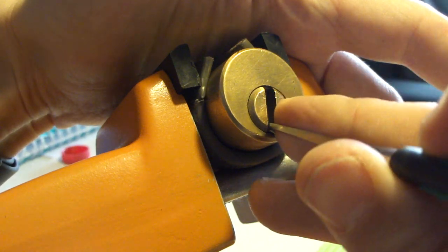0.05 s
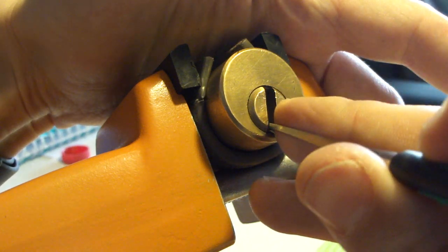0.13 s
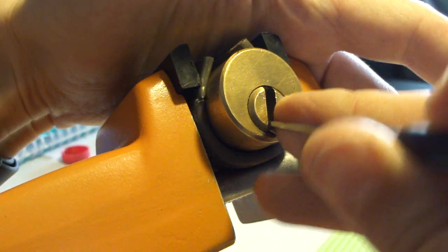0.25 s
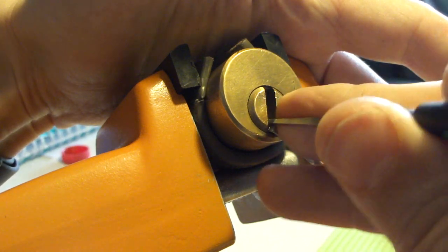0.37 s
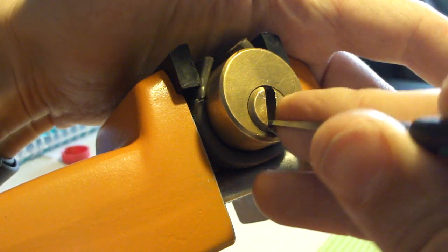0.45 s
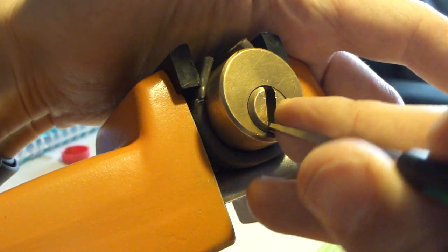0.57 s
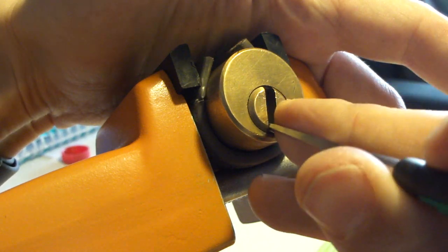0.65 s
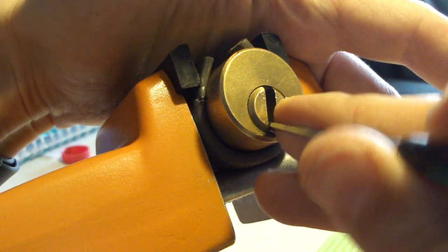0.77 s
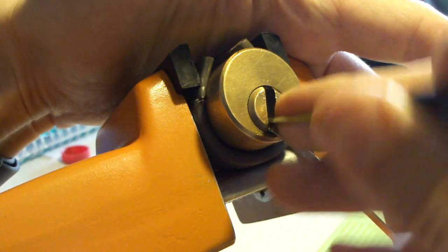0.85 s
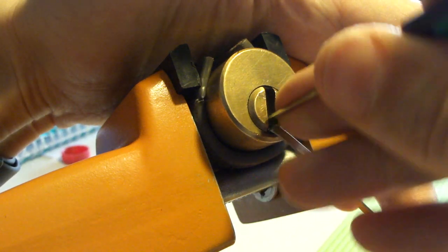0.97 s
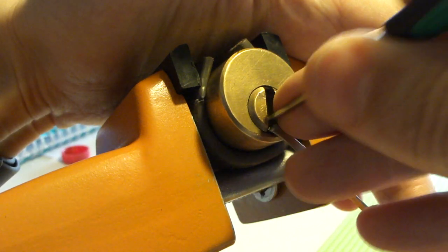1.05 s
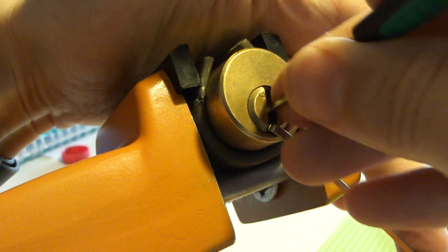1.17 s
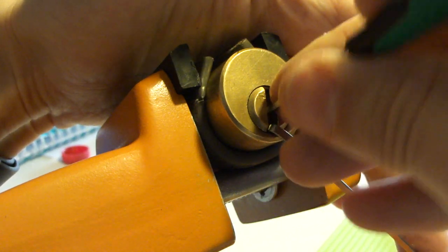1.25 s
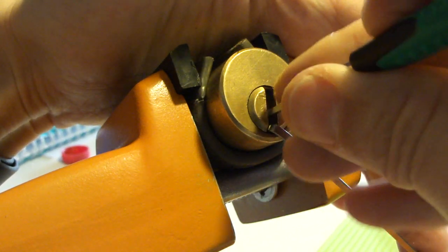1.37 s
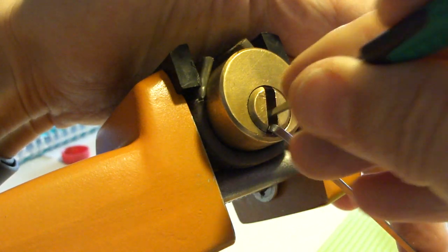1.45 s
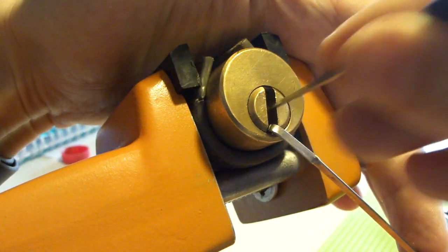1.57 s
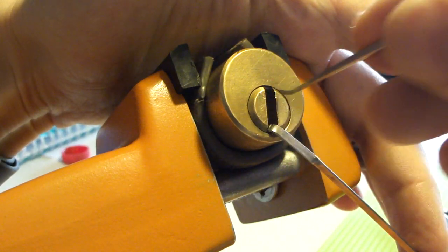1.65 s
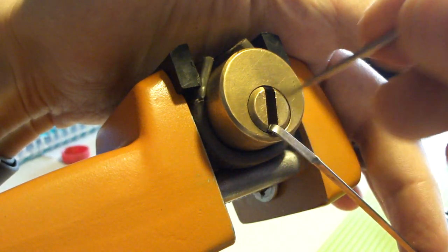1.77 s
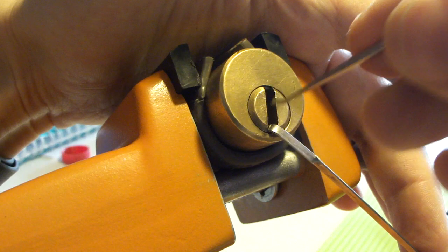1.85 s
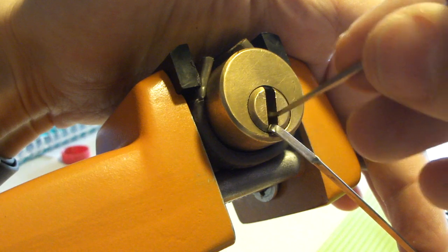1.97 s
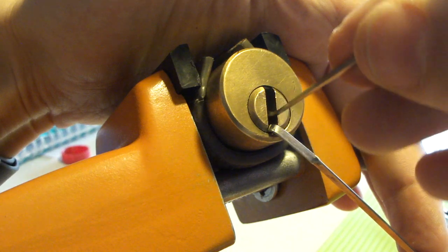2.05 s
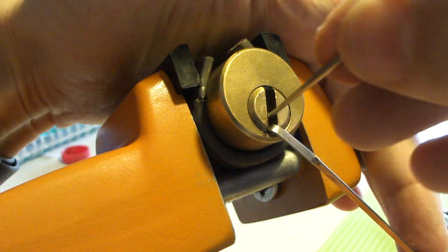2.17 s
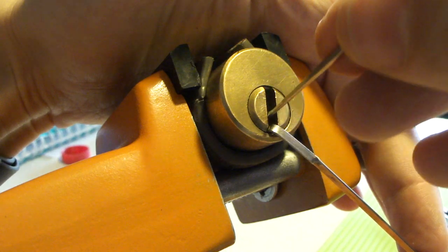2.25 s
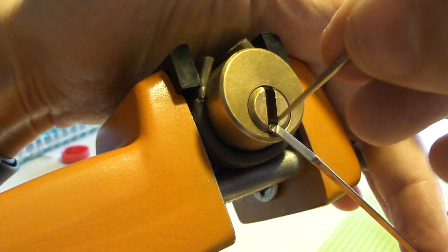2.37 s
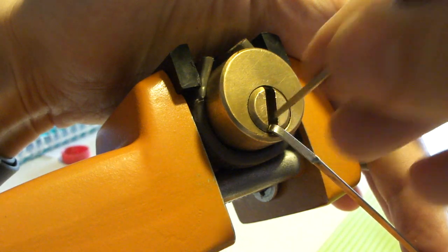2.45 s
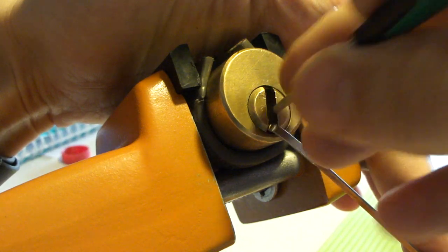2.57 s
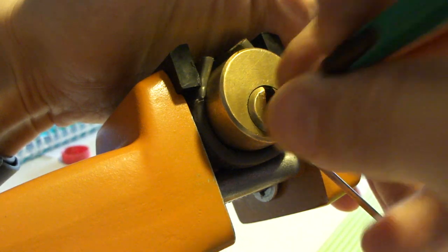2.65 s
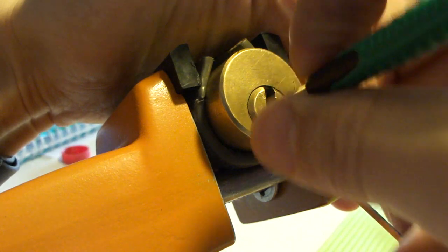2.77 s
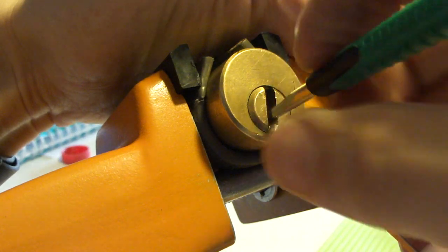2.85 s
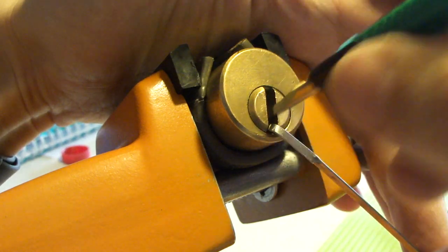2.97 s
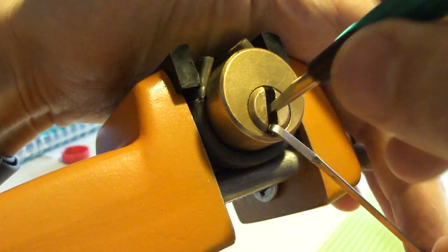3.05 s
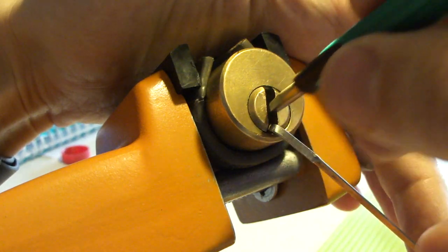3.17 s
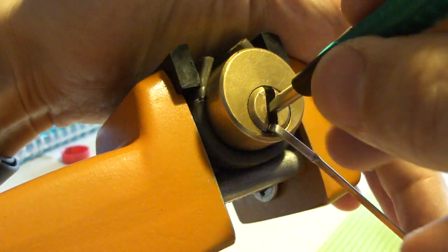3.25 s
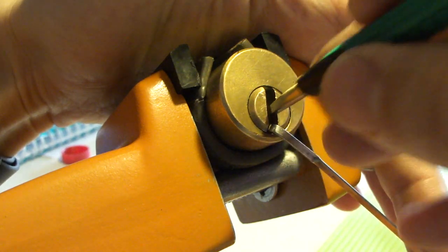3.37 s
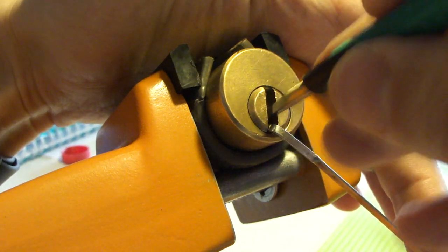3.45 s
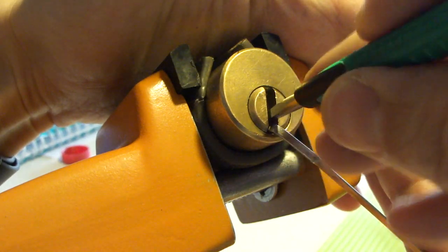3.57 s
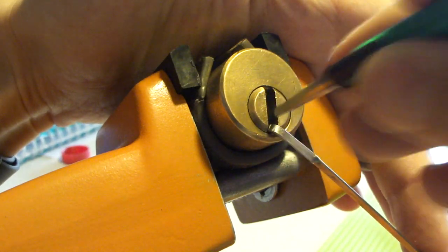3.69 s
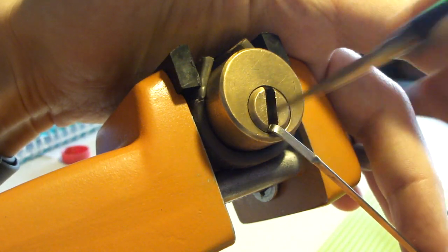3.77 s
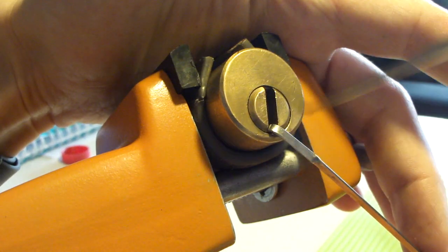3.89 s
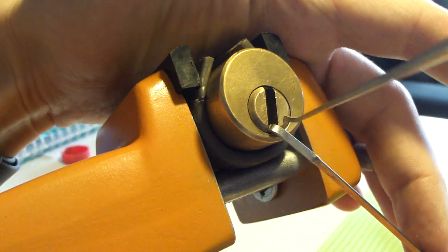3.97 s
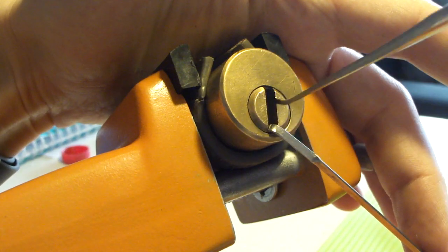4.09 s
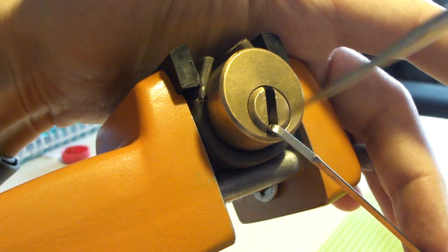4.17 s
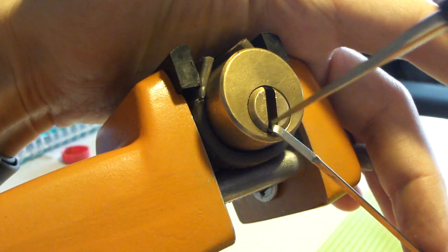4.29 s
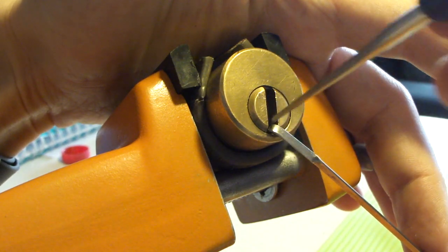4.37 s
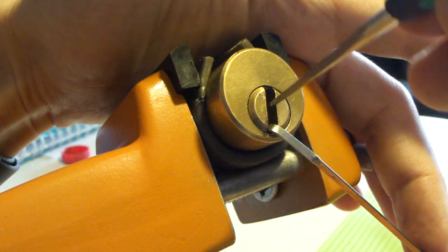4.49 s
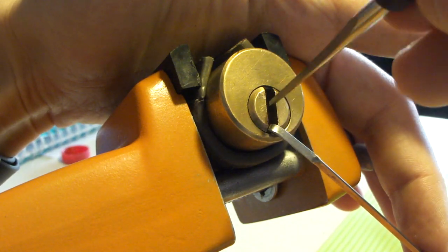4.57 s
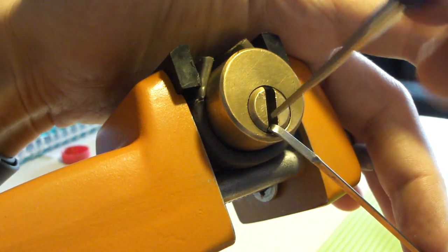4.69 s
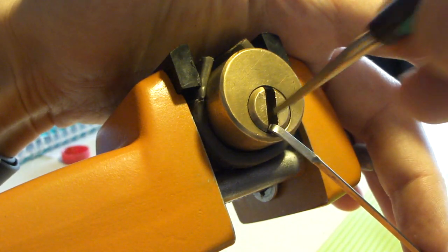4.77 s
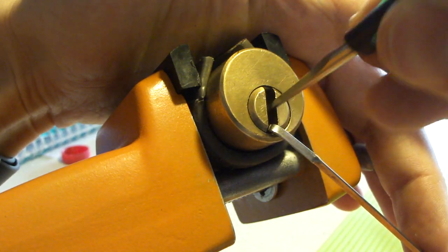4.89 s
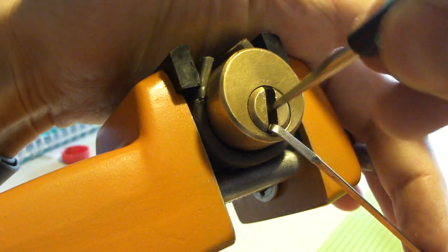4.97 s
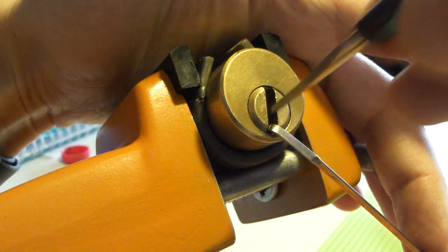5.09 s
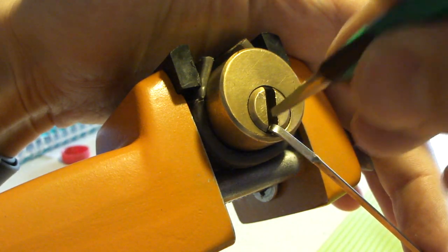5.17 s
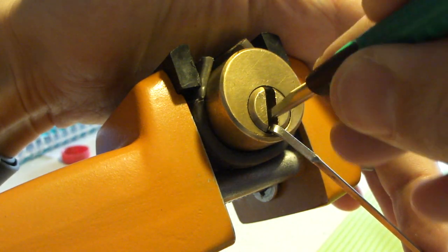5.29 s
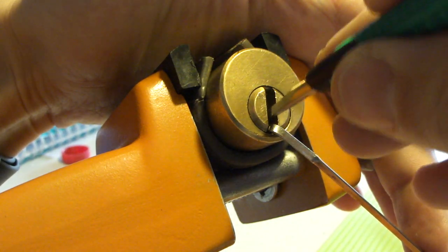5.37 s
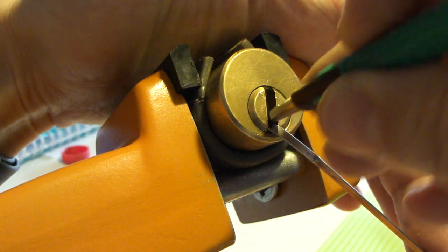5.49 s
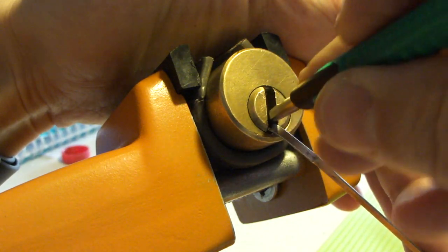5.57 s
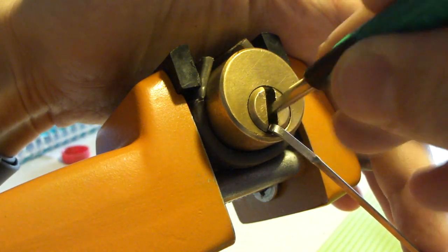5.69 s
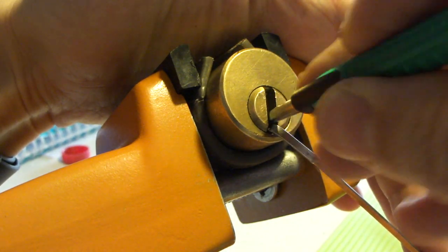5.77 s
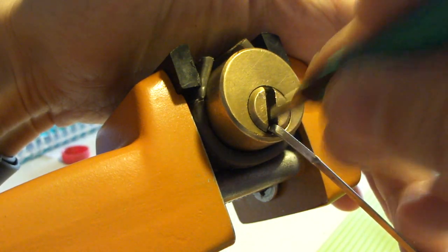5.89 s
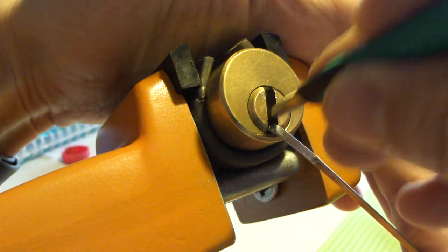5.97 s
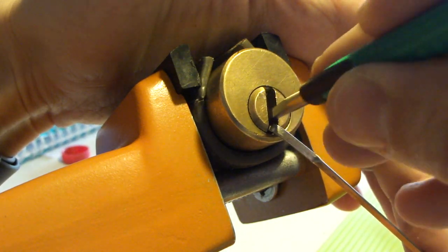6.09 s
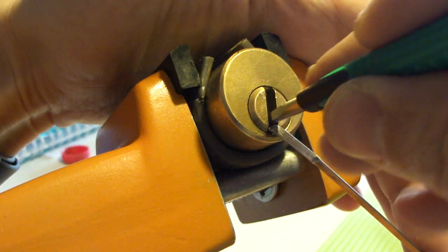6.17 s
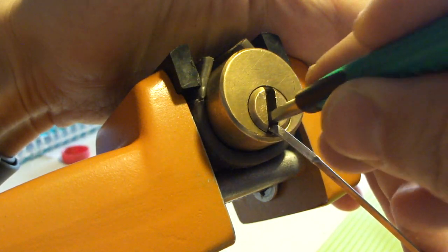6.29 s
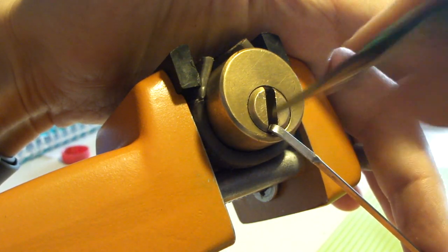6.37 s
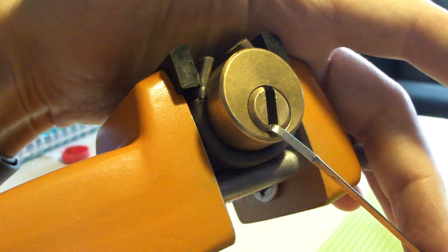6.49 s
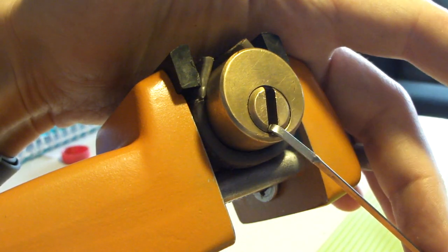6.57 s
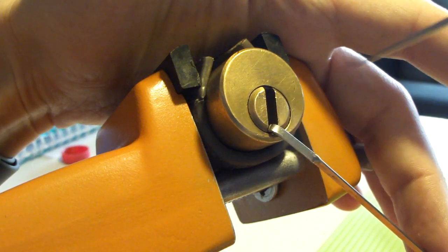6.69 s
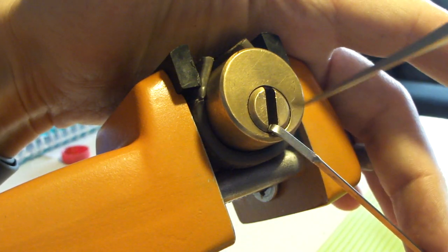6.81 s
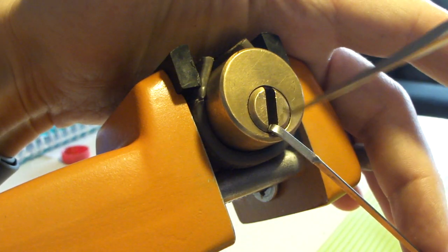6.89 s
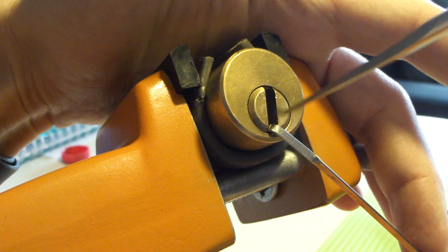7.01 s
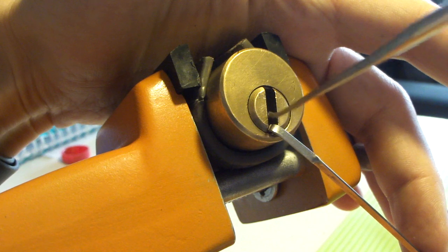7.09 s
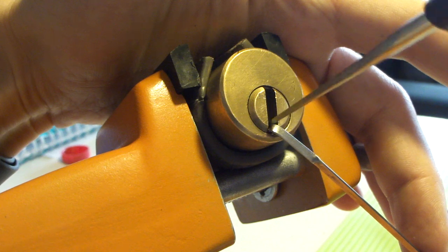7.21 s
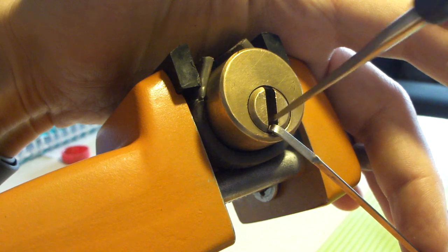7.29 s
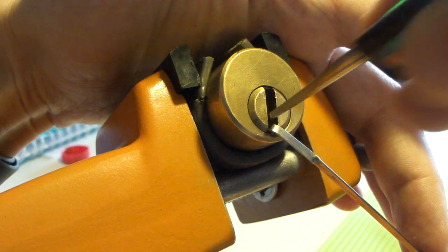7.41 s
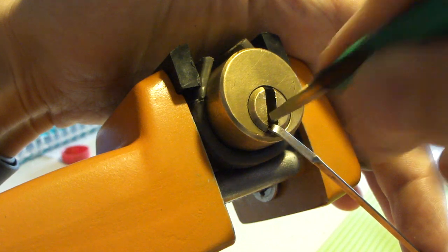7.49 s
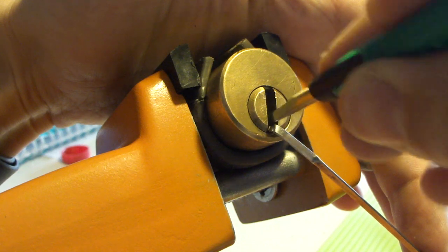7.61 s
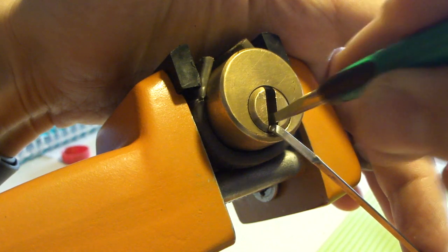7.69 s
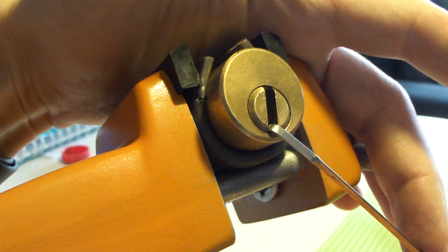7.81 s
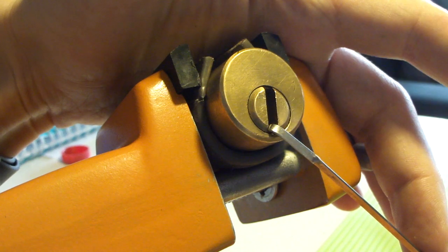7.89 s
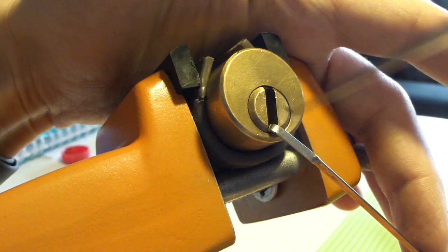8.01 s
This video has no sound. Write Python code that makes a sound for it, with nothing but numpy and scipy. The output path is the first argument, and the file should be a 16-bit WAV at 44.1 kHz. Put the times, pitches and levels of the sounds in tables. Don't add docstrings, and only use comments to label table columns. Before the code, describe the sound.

Close-up lock picking in a small room: sparse faint clicks, gritty metal scrapes, and sudden bright rattling bursts as the pick is pulled out.

```python
import sys
import numpy as np
from scipy import signal
from scipy.fft import rfft, irfft, next_fast_len
from scipy.io import wavfile
from scipy.ndimage import uniform_filter1d

SR = 44100
rng = np.random.default_rng(int(sys.argv[2]) if len(sys.argv) > 2 else 0)


def log_audio(samples):
    frames = np.atleast_2d(samples).T
    limited = np.clip(frames, -1, 1)
    pcm = np.round(limited * 32767).astype(np.int16)
    wavfile.write(sys.argv[1], SR, pcm)


def invert_db(x):
    u = np.asarray(x, float) / 20
    return 10 ** u


N = 355005
KNOCK_S = 0.00069
TICK_KINDS, KNOCK_KINDS = 180, 40
ROLL = 977


def rms_one(x):
    return x / np.sqrt(np.mean(x ** 2) + 1e-20)


def at_hz(points, hz):
    point_hz, point_db = np.transpose(points)
    return np.interp(np.log(hz), np.log(point_hz), point_db)


def filtered(x, order, hz, kind):
    return signal.sosfilt(signal.butter(order, hz, kind, fs=SR, output="sos"), x)


def drift(per_s):
    return np.interp(np.arange(N) * per_s / SR, np.arange(1000), rng.standard_normal(1000))


def grit(per_s, spread_db):
    sizes = invert_db(spread_db * np.minimum(rng.exponential(1, N), 4))
    sizes = sizes * rng.choice([-1, 1], N)
    return rms_one(sizes * (rng.random(N) < per_s / SR))


def contacts(seconds, length_s, heights, rise=1):
    steps = np.arange(-300, 301)
    width_s = 0.52 * length_s[:, None] * np.where(steps < 0, rise, 2 - rise)
    starts = ((seconds - 0.42 * (1 - rise) * length_s) * SR).astype(int)
    bells = heights[:, None] * np.exp(-(steps / SR / width_s) ** 2)
    return np.bincount((starts[:, None] + steps).ravel(), bells.ravel(), N)[:N]


def ring(clicks, hz, t60_s):
    r = invert_db(-60 / (t60_s * SR))
    w = 2 * np.pi * hz / SR
    return signal.lfilter([0, np.sin(w)], [1, -2 * r * np.cos(w), r * r], clicks + 1e-18)


def ports(x, count):
    return np.array([np.roll(x, count), x])


def strike(seconds, length_s, level_db, modes, scatter_db, sway_db, surface, count):
    luck = np.resize(rng.standard_normal((count, len(modes))), (len(seconds), len(modes)))
    gains = invert_db(level_db + scatter_db * luck)
    out = np.zeros((2, N))
    for k, (hz, db, t60_s) in enumerate(modes):
        sign = (-1) ** k
        push = contacts(seconds, length_s, gains[:, k]) * np.roll(surface, ROLL * k)
        sides = invert_db(db + sway_db * sign * np.array([[1], [-1]]))
        lag = 3 * (k % 3 - 1) * (hz > 1500)
        out += sign * sides * ports(ring(push, hz, t60_s), lag)
    return out


def hiss():
    # (f/Hz, density/dB per Hz)
    colour = [(24, -78), (40, -47.5), (136, -5.5), (173, -14), (226, -4.5), (1920, -10.5), (2960, -30.5),
              (7920, -24), (12000, -41.5), (16200, -79.5), (22000, -120)]
    level_db, likeness = -53.5, -0.2
    hz = np.maximum(np.fft.rfftfreq(N, 1 / SR), 1)
    mid, side = rfft(rng.standard_normal((2, N))) * invert_db(at_hz(colour, hz))
    alike = likeness / (1 + (hz / 3500) ** 2)
    pair = np.sqrt(1 + alike) * mid + np.sqrt(1 - alike) * side * [[1], [-1]]
    return invert_db(level_db) * rms_one(irfft(pair, N))


def room(x):
    t60_s, wall_cut_hz, room_db = 0.79, 680, -25.5
    bright_db, bright_t60_s, bright_above_hz = -79, 0.54, 1300
    size = next_fast_len(N + SR)
    w = 2 * np.pi * np.arange(size // 2 + 1) / size
    wall = 1 / (1 + 1j * w * SR / (2 * np.pi * wall_cut_hz)) ** 0.14
    echoes = np.zeros((2, len(w)), complex)
    lags = (rng.uniform(0.0051, 0.025, 20) * SR).astype(int)
    for k, lag in enumerate(lags):
        loop = invert_db(-60 * lag / SR / t60_s) * wall * np.exp(-1j * w * lag)
        echoes[k % 2] += (-1) ** (k // 2) * loop / (1 - loop)
    t = np.arange(SR // 2) / SR
    scatter = rng.standard_normal((2, len(t))) * invert_db(-60 * t / bright_t60_s) * (t > .003)
    bright = 1j * w * SR / (2 * np.pi * bright_above_hz)
    echoes += invert_db(bright_db - room_db) * rfft(scatter, size) * (bright / (1 + bright)) ** 2
    return invert_db(room_db) * irfft(echoes * rfft(x, size), size)[:, :N]


def arrive(pair):
    lag_s = 1.2e-5
    hz = np.fft.rfftfreq(N, 1 / SR)
    left = invert_db(-1.2 * hz / (hz + 1500)) * np.exp(-2j * np.pi * hz * lag_s)
    return np.array([irfft(rfft(pair[0]) * left, N), pair[1]])


def vise_knocks():
    # (t/s, peak/dB, colour/Hz, relative cylinder ring/dB)
    blows = [(.7383, -24.5, 620, -11), (1.317, -36.5, 620, -20), (1.546, -25.5, 537, 3),
             (1.582, -30.5, 503, -14), (1.639, -31.5, 240, -12), (2.013, -39, 1020, 12.5),
             (2.201, -34, 1280, -14), (2.746, -36, 250, 0), (3.021, -35, 667, -3), (3.234, -38, 487, 0.5),
             (3.528, -26.5, 606, 6), (3.705, -32, 464, 6.5), (3.769, -30, 570, 7), (3.814, -25, 305, 8.5),
             (4.003, -34, 557, 0), (4.032, -30, 450, -16), (4.463, -24, 1430, 5.5), (4.871, -27, 1300, 4),
             (5.261, -36, 245, 10.5), (5.491, -25.5, 640, 0.5), (5.7895, -22, 560, 5.5),
             (5.953, -24, 530, -26), (6.185, -34.5, 626, -5), (6.394, -25.5, 1060, -3),
             (6.45, -24.5, 627, -22), (6.954, -34.5, 1090, 14), (7.552, -34.5, 370, 9.5),
             (7.641, -34.5, 417, 0.5), (7.762, -23.5, 506, -1), (7.803, -22, 540, -8)]
    # (t/s, peak/dB)
    nudges = [(3.059, -41.5), (3.402, -46.5), (4.9, -38.5), (5.759, -37.5), (5.783, -27.5), (4.089, -41),
              (5.552, -36), (5.637, -37.5), (6.318, -37), (7.71, -33)]
    # (t/s, peak/dB, colour/Hz, relative cylinder ring/dB)
    rebounds = [
        (0.753, -38, 400, -24),
        (0.772, -47, 1000, -20),
        (0.791, -43, 520, -20),
        (0.812, -46, 400, -18),
    ]
    nudge_hz, nudge_ring_db = 530, 3.5
    return blows + [(s, db, nudge_hz, nudge_ring_db) for s, db in nudges] + rebounds


def vise(knocks, friction_db):
    # (f/Hz, level/dB, T60/s)
    jaw_modes = [(125, -16.5, 0.12), (219.6, -11.5, 0.16), (295, -12, 0.13), (392.6, -11.5, 0.17),
                 (487, -1.5, 0.045), (540, -1, 0.056), (641, -0.5, 0.039), (825, -5.5, 0.09),
                 (1043, 8.5, 0.035), (1172, 6, 0.037), (1413, 13, 0.039)]
    bench_hz, bench_upper_hz, bench_t60_s = 129.6, 204, 0.16
    bench_db, bench_steepness = -5, 1.4
    s, peak_db, colour_hz, _ = np.transpose(knocks)
    s, length_s = s + KNOCK_S, np.full(len(s), KNOCK_S)
    mode_hz = np.array(jaw_modes)[:, 0]
    lean_db = 12.66 * np.exp(-(np.log(mode_hz / colour_hz[:, None]) / 0.44) ** 2)
    hits = strike(s, length_s, peak_db[:, None] - 38.0 + lean_db, jaw_modes,
                  scatter_db=1.5, sway_db=0.3, surface=0.86, count=KNOCK_KINDS)
    hits = filtered(hits, 2, [150, 2000], "band")
    fade = invert_db(-60 / (.2 * SR))
    blows = contacts(s, length_s, invert_db(peak_db + 19.0))
    shaking = signal.lfilter([1 - fade], [1, -fade], blows + 1e-18)
    rattle = grit(1500, spread_db=2.0)
    loose = rms_one(filtered(rattle, 3, [200, 1200], "band"))
    tuned = sum(ring(np.roll(rattle, ROLL * k), hz, 0.049) for k, (hz, *_) in enumerate(jaw_modes[1:7]))
    loose = rms_one(loose + 0.92 * rms_one(tuned))
    bench = rms_one(ring(rattle, bench_hz, bench_t60_s) + ring(rattle, bench_upper_hz, bench_t60_s))
    rumble = invert_db(bench_steepness * friction_db + bench_db) * bench
    return hits + (shaking + invert_db(friction_db - 10.5)) * loose + rumble


def pressure():
    # (start/s, peak/s, end/s, friction/dB, cylinder ring/dB)
    strokes = [(1.053, 1.081, 1.18, -56.5, -58), (1.135, 1.168, 1.25, -56, -62),
               (1.247, 1.271, 1.45, -62, -52.5), (2.407, 2.55, 2.62, -54, -60),
               (2.57, 2.64, 2.72, -42, -53.5), (2.62, 2.745, 2.777, -46.5, -49.5),
               (3.011, 3.023, 3.1, -50, -40.5), (3.09, 3.163, 3.26, -51.5, -50.5),
               (3.35, 3.415, 3.5, -52.5, -47), (3.483, 3.534, 3.563, -44.5, -41),
               (3.626, 3.647, 3.74, -47.5, -50), (4.307, 4.322, 4.37, -45.5, -55),
               (4.424, 4.44, 4.49, -43, -48.5), (4.724, 4.727, 4.84, -48, -65),
               (4.726, 4.85, 4.927, -45.5, -49.5), (5.034, 5.063, 5.17, -53, -56),
               (5.11, 5.17, 5.3, -50, -46.5), (5.447, 5.484, 5.556, -44, -39),
               (5.63, 5.707, 5.77, -52, -48.5), (5.73, 5.759, 5.86, -49, -52), (5.9, 5.95, 6.0, -46, -49),
               (6.04, 6.082, 6.14, -49.5, -51), (7.199, 7.211, 7.25, -53, -56.5),
               (7.332, 7.342, 7.47, -51.5, -53), (7.405, 7.48, 7.57, -45, -49.5),
               (7.47, 7.535, 7.566, -53, -40)]
    # (peak/s, friction/dB, cylinder ring/dB)
    jiggles = [(4.681, -45, -68), (5.64, -66, -47), (5.884, -49, -47), (6.023, -46.5, -49.5),
               (6.17, -56, -65.5), (6.31, -57, -63.5), (6.385, -59.5, -46.5)]
    # (start/s, end/s, friction at start/dB, friction at end/dB, cylinder ring/dB)
    pulls = [
        (1.546, 1.658, -43.5, -57, -47),
        (3.729, 3.849, -43, -40.5, -39.5),
        (6.408, 6.444, -27.5, -26.5, -30.5),
        (7.722, 7.727, -47, -64, -34),
        (7.757, 7.83, -37, -31, -38.5),
    ]
    jiggle_s, edge_db, bend = 0.027, -25.5, 1.5
    lead_db_per_s, settle_db, settle_db_per_s = 710, -22.5, 132
    rest_db, rest_ring_db = -80.5, -69.5
    t = np.arange(0, N + 64, 64) / SR
    slides = strokes + [(s - jiggle_s, s, s + jiggle_s, *db) for s, *db in jiggles]
    start, peak, end, friction_db, ring_db = np.transpose(slides)[:, :, None]
    away = np.maximum((peak - t) / (peak - start), (t - peak) / (end - peak))
    swell_db = edge_db * np.abs(away) ** bend
    start, end, first_db, last_db, pull_ring_db = np.transpose(pulls)[:, :, None]
    pull_db = first_db + (last_db - first_db) * np.clip((t - start) / (end - start), 0, 1)
    run_up_db = lead_db_per_s * np.minimum(t - start, 0)
    gate_db = np.where(t > end, settle_db - settle_db_per_s * (t - end), run_up_db)
    friction = invert_db(friction_db + swell_db).sum(axis=0) + invert_db(pull_db + gate_db).sum(axis=0)
    ringing = invert_db(ring_db + swell_db).sum(axis=0) + invert_db(pull_ring_db + gate_db).sum(axis=0)
    levels = [invert_db(rest_db) + friction, invert_db(rest_ring_db) + ringing]
    return [np.interp(np.arange(N) / SR, t, 20 * np.log10(v)) for v in levels]


def pick_ticks():
    rakes = [(1.545, -19, -9, 1.8), (1.548, -21, -9.5, 1.9), (1.5513, -13.5, -2, 0.94),
             (1.566, -19.5, -12, 0.6), (1.5776, -7, -12, 0.84), (1.5833, -10.5, -6, 0.59),
             (1.594, -19, -3, 0.52), (1.6045, -8, -23, 0.84), (1.608, -16.5, -8, 3.2),
             (1.6365, -16.5, -21, 1.6), (1.6458, -12.5, -25, 0.75), (1.6491, -16.5, -16, 3.8),
             (3.7153, -10, -7.5, 2.3), (3.7427, -16.5, -5.5, 1.6), (3.7635, -13, -9, 0.87),
             (3.7682, -19, -8, 2.8), (3.7809, -16.5, -18, 1), (3.8106, -13, -8, 2.2),
             (3.8145, -9, -11, 2.3), (3.8226, -9.5, -15, 0.97), (3.828, -6.5, -9.5, 0.6),
             (3.8376, -10, -9.5, 1.2), (3.8401, -16, -8, 2), (3.8551, -18, -7, 1.3), (3.8603, -9, -12, 1.5),
             (3.8622, -2.5, -21.5, 0.64),
             (6.3951, -5, -8, 1.3), (6.3983, -7.5, -1, 1.1), (6.4074, -8.5, -8, 1.3),
                  (6.4100, -12, -11.5, 1.2), (6.4182, -9, -10, 1.6), (6.425, -14.5, -6, 1.3),
                  (6.437, -9, -12, 2), (6.443, -6.5, 1.5, 1.2), (6.4466, -10.5, -10, 0.99),
                  (6.4509, -12, -7, 1.3), (6.4545, -17.5, -11, 1.1), (7.712, -15.5, -5.5, 2.9),
                  (7.7544, -20, -14, 0.9), (7.760, -12, -1.5, 1.7), (7.7762, -11.5, -10, 2.3),
                  (7.783, -14, -5, 2.6), (7.7995, -9, -8, 1.05), (7.8032, -7.5, -9, 0.75),
                  (7.8062, -5.5, -5, 0.71), (7.8084, -8, -4, 1.8), (7.8134, -9, -12, 1.2),
                  (7.8197, -9, -7, 0.8), (7.8223, 3, -22.5, 0.26)]
    drags = [(1.547, -22.5, 1, 10), (3.708, -20, -3.5, 5.8), (3.7411, -18.5, 6, 5.3), (3.768, -16, 3, 7.4),
             (3.783, -21, -4, 5.2), (6.4457, -14.5, 8.5, 5.5), (7.716, -20, 6.5, 3.5),
             (7.756, -18.5, 0, 7.9), (7.773, -14, -1, 5), (7.779, -25, 10, 6), (7.8199, -12, -3, 5.8)]
    probes = [(0.951, -44, 3, 7.9), (1.061, -41, 0, 2), (1.1166, -44, -1, 3.4), (1.171, -35, -17, 3.4),
              (1.178, -36, -2, 8), (1.319, -35, 12, 5.5), (1.9417, -39.5, -13, 18), (2.006, -42.5, 3, 6.1),
              (2.1284, -38, 4.5, 1.6), (2.1533, -29.5, -10, 0.35), (2.2044, -44, 18.5, 3.2),
              (2.3625, -30, -2, 0.97), (2.382, -32.5, -18, 3.6), (2.488, -35, 0, 3.1),
              (2.5243, -36, 1, 2.3), (2.751, -41, 4.5, 5), (2.984, -42.5, 10, 13), (3.022, -22, -8, 4),
              (3.027, -20.5, -0.5, 1.8), (3.077, -34, -13, 7.5), (3.129, -39.5, 8, 6.3),
              (3.3636, -37.5, -1, 1.9), (3.403, -31.5, 1.5, 10.5), (3.463, -36.5, 2, 6),
              (3.532, -36, -22, 14), (3.648, -29.5, -12, 1.3), (4.0035, -33.5, 8, 2.9),
              (4.034, -35, 16, 8.6), (4.0917, -43.5, 19, 5.4), (4.146, -47, 7.5, 5.8),
              (4.3176, -37, -26, 3.5), (4.334, -38, 10.5, 10), (4.4349, -29, -13, 5.9),
                   (4.4644, -21.5, 2, 2.1), (4.6658, -38.5, -3, 8.3), (4.6795, -36, -22, 2.1),
                   (4.7368, -20, -8, 2.5), (4.811, -36, 9.5, 14), (4.872, -31, 11, 9.9),
                   (5.035, -41.5, 12.5, 8.2), (5.064, -34, 8, 1.4), (5.262, -39, 9, 14),
                   (5.41, -37.5, 2, 4.9), (5.494, -24, -29, 4.7), (5.4988, -33, 13.5, 4.2),
                   (5.61, -40.5, 16, 9.1), (5.7, -34, -26.5, 7.4), (5.788, -23.5, 7, 2.2),
                   (5.8722, -32.5, -4, 2.1), (5.891, -36.5, -7, 7.5), (5.953, -22, 3.5, 3.9),
                   (6.184, -28.5, 0, 5.1), (6.2238, -21, -7, 0.83), (6.318, -35, 10, 4.5),
                   (6.955, -35, -4, 3.9), (7.2093, -30, -31, 2), (7.3825, -28.5, -14, 1.9),
                   (7.552, -29, 3, 2.9), (7.639, -29, -1, 1.5), (7.66, -37, -1, 8.5)]
    # (t/s, peak/dB)
    touches = [(2.5645, -33.5), (4.97, -50), (3.0857, -35.5), (4.531, -38), (5.1122, -47), (5.472, -33),
               (5.6018, -38), (5.6428, -36.5), (5.6595, -50), (5.731, -35), (5.8092, -34.5), (5.9785, -36),
               (6.101, -34.5), (7.422, -33.5), (7.6949, -38)]
    # (t/s, peak/dB)
    catches = [(2.5929, -33), (2.6003, -36), (2.6152, -37), (2.6188, -36), (2.6297, -31), (2.6388, -29),
               (2.6462, -31), (2.651, -29), (2.6717, -34), (2.6985, -36), (2.7056, -35), (2.7403, -32),
               (2.7501, -33), (4.8117, -25), (4.8262, -33), (4.8483, -31), (4.8544, -31), (4.8723, -27),
               (5.0592, -35), (5.0621, -31), (5.0648, -36), (5.0813, -39), (5.1343, -39), (5.1374, -37),
               (5.1451, -36), (5.1567, -36), (5.1662, -33), (5.1763, -37), (5.1885, -36), (5.1926, -39),
               (5.2432, -39), (5.261, -35), (5.2638, -35), (7.421, -34), (7.4346, -33), (7.4474, -32),
               (7.4559, -36), (7.4679, -36), (7.4697, -35), (7.4733, -30), (7.4777, -31), (7.4825, -31),
               (7.496, -31), (7.5013, -35), (7.5521, -31)]
    strays = [(0.68, -52, 9, 2.7), (7.1033, -44.5, 5, 3.8), (7.1766, -48, -9, 3), (7.2394, -47, 2, 4),
              (7.3223, -45, -9, 4), (7.3362, -40, -9, 0.84), (7.3482, -41, -5, 2), (3.006, -43, -10, 2),
              (3.0187, -16, -15, 1), (3.037, -43, 23.5, 7), (3.061, -35, -3, 4), (2.685, -42, 8, 4),
              (2.708, -38, 9, 4.4), (1.5412, -26, -6, 2.2), (1.655, -31, -9, 1.5), (4.52, -40, -5, 5.7),
              (4.799, -34, 1, 1.7), (4.5, -36, 5, 1.8), (4.898, -36, 9, 2.7), (6.4205, -12.5, -12, 6.8),
              (6.3935, -27, -10, 1.5), (5.879, -39, 9, 3), (4.454, -34, -3, 2.2), (5.145, -32, -4, 5),
              (5.166, -29, -6, 9), (5.189, -32, -2, 5), (5.13, -36, -8, 8), (5.113, -37, -8, 1.5),
              (7.436, -32, -8, 9), (7.475, -28, -10, 8), (7.495, -29, -10, 8), (7.534, -34, 8, 4),
              (7.654, -38, -8, 1.5), (7.8052, -13, -6, 0.68), (7.7, -49, 19, 3), (6.977, -52.5, 14, 3)]
    touch_ring_db, touch_ms = -1.5, 1.7
    catch_gain_db, catch_ring_db, catch_ms = -1.5, -13, 1.2
    ticks = rakes + drags + probes
    ticks = ticks + [(s, db, touch_ring_db, touch_ms) for s, db in touches]
    ticks = ticks + [(s, db + catch_gain_db, catch_ring_db, catch_ms) for s, db in catches]
    return ticks + strays


def cylinder(ticks, knocks, ring_db):
    # (f/Hz, level/dB, T60/s)
    brass_modes = [(1610, -8.5, 0.01), (1621, 1, 0.026), (1713, -9.5, 0.053), (1854, 0.5, 0.066),
                   (1972.4, 0, 0.051), (2291, -3.5, 0.025), (2603, -6, 0.014), (3500, -34, 0.01),
                   (4430, -14, 0.02)]
    wrench_side_s = [1.317, 2.013, 2.2, 2.746, 4.463, 4.87, 7.552]
    wrench_hz, plug_hz, side_lean_db = 1690, 1825, 4.5
    seat_wander_db = 4.5
    s, peak_db, rel_db, length_ms = np.transpose(ticks)
    level_db = peak_db + rel_db - 14.0 - 10 * np.log10(length_ms / 1000 * SR)
    hits = strike(s, length_ms / 1000, level_db[:, None], brass_modes, scatter_db=4.0, sway_db=1.0,
                  surface=grit(15000, spread_db=-2.0), count=TICK_KINDS)
    s, peak_db, _, rel_db = np.transpose(knocks)
    on_wrench = np.abs(s[:, None] - wrench_side_s).min(axis=1) < .01
    side_hz = np.where(on_wrench, wrench_hz, plug_hz)
    mode_hz = np.array(brass_modes)[:, 0]
    lean_db = side_lean_db * np.exp(-(np.log(mode_hz / side_hz[:, None]) / .07) ** 2)
    level_db = (peak_db + rel_db - 26.5)[:, None] + lean_db
    hits += strike(s + KNOCK_S, np.full(len(s), KNOCK_S / 2), level_db, brass_modes,
                   scatter_db=4.5, sway_db=0.0, surface=0.91, count=KNOCK_KINDS)
    rough = grit(700, spread_db=5.0)
    seat = rms_one(uniform_filter1d(uniform_filter1d(rough, size=1500), size=1500))
    rub = np.zeros(N)
    for k, (hz, db, t60_s) in enumerate(brass_modes):
        turn = invert_db(db + seat_wander_db * np.roll(seat, 30011 * k))
        rub += turn * ring(np.roll(rough, ROLL * k), hz, t60_s)
    return hits + invert_db(ring_db - 0.5) * rms_one(rub)


def cracks(seconds, level_db, colour_hz):
    out = np.zeros((2, N))
    for s, db, hz in zip(seconds, level_db, colour_hz):
        crack = invert_db(db) * ring(np.eye(1, 200)[0], hz, t60_s=.0025)
        start = int(s * SR)
        out[0, start + 1:start + 201] += crack
        out[1, start:start + 200] += crack
    return out


def pins(ticks, friction_db):
    # (f/Hz, level/dB)
    pin_tops = [(5300, -14.5), (6200, 1.5), (8000, -4.5), (10000, -1), (11500, -11.5), (12900, -5),
                (14000, -6), (15500, -39)]
    # (t/s, f/Hz)
    grip = [(1.66, 9460), (2.0, 6350), (3.0, 6900), (3.3, 9700), (3.8, 7600), (5.6, 8040), (6.4, 7440)]
    # (t/s, lower f/Hz, upper f/Hz)
    shaft = [(1.0, 6700, 9350), (2.5, 6640, 9900), (2.6, 6370, 9500), (2.66, 6370, 9200),
             (2.69, 6450, 8650), (2.77, 6640, 9800), (3.1, 6700, 9800), (3.501, 6960, 8600),
             (4.451, 6300, 9040), (4.75, 6170, 9200), (4.87, 5660, 7050), (5.05, 6560, 9400),
             (5.15, 6180, 7860), (5.27, 6800, 9800), (6.1, 7400, 8960), (7.35, 7020, 8900),
             (7.55, 5930, 9530)]
    modes, t60_s, colour_spread = 30, 0.0079, 0.12
    rise_share = 0.34
    shaft_gain_db, shaft_width, patch_db = 8.5, .045, 4.5
    rasp_clump_db, rasp_share = 3, .75
    crack_db, crack_loss_db_per_ms = -7, 5.5
    s, peak_db, _, length_ms = np.transpose(ticks)
    colour_luck = np.resize(rng.standard_normal(TICK_KINDS), len(s))
    colour_hz = np.interp(s, *np.transpose(grip)) * np.exp(colour_spread * colour_luck)
    pitches_hz = np.geomspace(5400, 15500, modes) * invert_db(0.04 * rng.standard_normal(modes))
    luck = np.resize(rng.standard_normal((TICK_KINDS, modes)), (len(s), modes))
    snap = grit(14000, spread_db=1.5)
    rasp = rasp_share * grit(1500, spread_db=2.0) * invert_db(rasp_clump_db * drift(90))
    fine = grit(6100, spread_db=6.5)
    patch = drift(3.4)
    shaft_s, *shaft_hz = np.transpose(shaft)
    bands_hz = np.array([np.interp(np.arange(0, N, 64) / SR, shaft_s, hz) for hz in shaft_hz])
    out = np.zeros((2, N))
    for k, hz in enumerate(pitches_hz):
        lean_db = 7.2 * np.exp(-(np.log(hz / colour_hz) / 0.16) ** 2)
        heights = invert_db(peak_db - 33.5 + lean_db + 4.1 * luck[:, k])
        snaps = contacts(s, length_ms / 1000, heights, rise_share) * np.roll(snap, ROLL * (k // 3))
        patch = .6 * patch + .8 * drift(17)
        nearness = np.exp(-(np.log(hz / bands_hz) / shaft_width) ** 2).sum(axis=0)
        shaft_db = np.repeat(shaft_gain_db * nearness, repeats=64)[:N]
        rub = invert_db(friction_db - 26.0 + shaft_db + patch_db * patch)
        rub = rub * (rasp + 0.9 * np.roll(fine, ROLL * k))
        voice = invert_db(at_hz(pin_tops, hz)) * ring(snaps + rub, hz, t60_s)
        out += [np.roll(voice, k % 4 - 1) * invert_db(rng.normal(0, 0.65)), voice]
    out += cracks(s, peak_db + crack_db - crack_loss_db_per_ms * length_ms, colour_hz)
    return filtered(out, 2, 4400, "high")


def scene():
    friction_db, ring_db = pressure()
    ticks, knocks = pick_ticks(), vise_knocks()
    lock = vise(knocks, friction_db) + cylinder(ticks, knocks, ring_db) + pins(ticks, friction_db)
    return hiss() + room(lock.mean(axis=0)) + arrive(lock)


def roll_off(x):
    return signal.sosfilt(signal.butter(12, 16040, fs=SR, output="sos"), x)


def record(dry):
    # (f/Hz, width/Hz)
    dips = [(3000, 176), (4000, 550), (4980, 500), (13450, 360)]
    overload = 1.1
    peak_hz, peak_width_hz, peak_db = 14000, 240, 22
    x = filtered(dry, 2, 110, "high")
    for hz, width_hz in dips:
        for _ in range(2):
            x = signal.lfilter(*signal.iirnotch(hz, hz / width_hz, SR), x)
    x = overload * np.tanh(x / overload)
    x = x + invert_db(peak_db) * signal.lfilter(*signal.iirpeak(peak_hz, peak_hz / peak_width_hz, SR), x)
    x = signal.sosfilt(signal.cheby2(8, 27.0, 12100, fs=SR, output="sos"), x)
    x = filtered(x, 6, 15700, "low")
    return roll_off(x)


dry = scene()
out = record(dry)
log_audio(out)
```